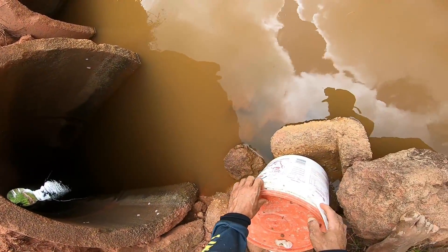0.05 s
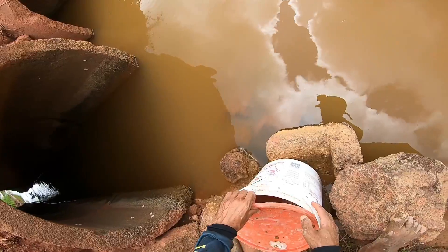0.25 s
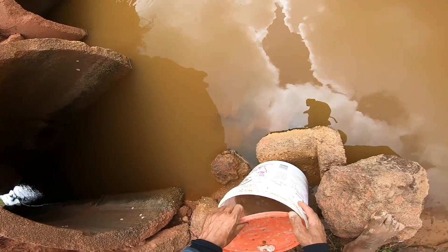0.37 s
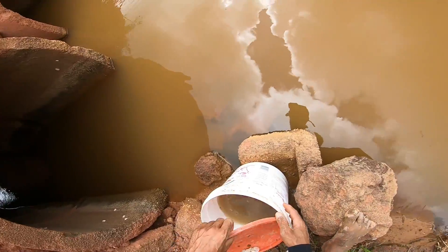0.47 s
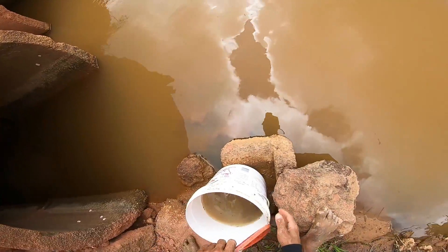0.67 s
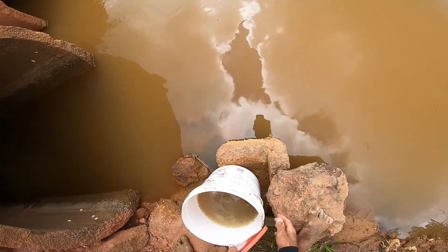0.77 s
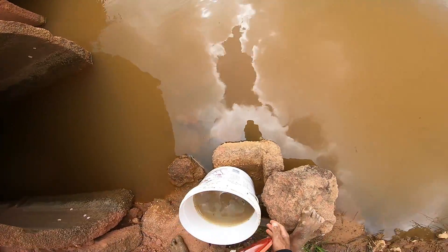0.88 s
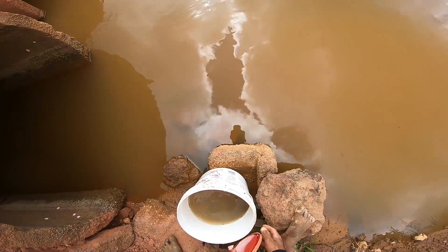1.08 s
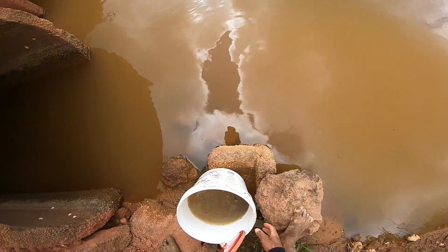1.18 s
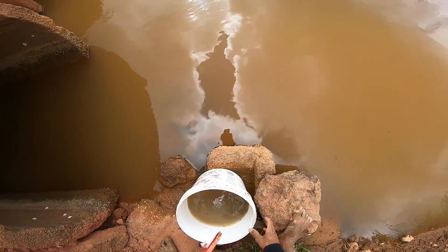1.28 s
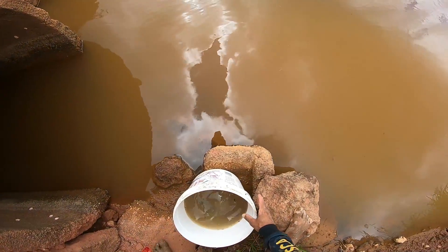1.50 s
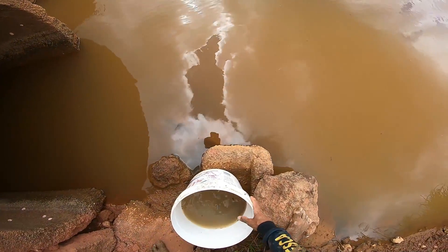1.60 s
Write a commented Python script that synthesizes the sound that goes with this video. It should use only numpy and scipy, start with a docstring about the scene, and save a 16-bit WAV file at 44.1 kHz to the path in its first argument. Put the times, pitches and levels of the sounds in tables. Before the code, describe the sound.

Plastic bucket being opened and set down: lid thump, scraping rattle, one booming knock, faint outdoor hiss

```python
"""Rocks beside a ditch and a concrete pipe: a plastic bucket of water stands close to two microphones.
Its lid pops off with a thump: a puff of noise, and two air tones that climb as the gap opens.
The lid rubs along the rim as fine clicks and friction noise; knocks are noise bursts with ringing modes,
and the water plops. One hard knock booms, an echo tail is the pipe's answer, and light ticks follow.
Faint outdoor hiss, shaped from noise, lies under it all."""
import sys
import numpy as np
from scipy import signal
from scipy.fft import rfft, irfft, next_fast_len
from scipy.io import wavfile

SR = 44100
rng = np.random.default_rng(int(sys.argv[2]) if len(sys.argv) > 2 else 0)


def waveform_to_disk(signal):
    """Save audio, clipped to [-1, 1], as 16-bit WAV at the path in sys.argv[1]."""
    frames = np.transpose(np.atleast_2d(signal))
    scaled = np.clip(frames, -1, 1) * 32767
    samples = np.round(scaled).astype(np.int16)
    wavfile.write(sys.argv[1], SR, samples)


N = 72765
TIME = np.arange(N) / SR
SIZE = next_fast_len(2 * N)
HZ = np.maximum(np.arange(SIZE // 2 + 1) * SR / SIZE, 1)

# plastic strikes plastic; levels are relative, ahead of colour and placing:
# start_s, level_1100hz_db, level_3300hz_db, level_7500hz_db, crack_t60_s, hollow_db, spot_hz, spot_db
CONTACTS = [(0.1514, -41, -55.5, -56, 0.025, -52, 1640, -57),
            (.248, -19.5, -30, -30, 0.035, -25, 2470, -26.5),
            (.2502, -29, -35.5, -53, 0.027, -35, 695, -19),
            (0.3006, -39.5, -20.5, -43.5, 0.029, -46.5, 2000, -26),
            (0.3199, -36, -40, -52, .019, -34, 2240, -42), (.362, -48, -43.5, -43, 0.13, -50.5, 2730, -38),
            (0.685, -35, -41, -56, .028, -48, 926, -35), (.694, -37.5, -45.5, -52, 0.021, -53, 1580, -41.5),
            (0.7214, -44, -52, -54.5, 0.058, -51.5, 1390, -49),
            (0.7736, -29.5, -29, -31, .042, -46.5, 5120, -32.5),
            (0.7752, -26.5, -33.5, -40.5, 0.03, -45, 3675, -26),
            (0.7776, -30, -36, -48, 0.053, -33, 1343, -17.5),
            (.7865, -40, -43, -52, 0.0085, -31.5, 2040, -35.5),
            (0.7924, -36, -36, -45.5, 0.017, -35, 3755, -37),
            (.8857, -34.5, -42, -48, 0.02, -45.5, 1170, -36.5),
            (0.9375, -23.5, -22, -22, 0.024, -43, 2910, -22),
            (.9398, -14.5, -32.5, -36.5, .015, -34, 1329, -18),
            (1.1629, -60, -37, -36.5, .028, -57.5, 3560, -43.5),
            (1.294, -73, -52.5, -69, 0.026, -82.5, 2850, -55),
            (1.316, -57, -57.5, -55, 0.025, -80.5, 3245, -48.5),
            (1.401, -79, -68, -53, 0.042, -84, 6150, -56)]


def from_db(db):
    """Decibels to gain."""
    return 10 ** (np.asarray(db) / 20)


def rms_one(x):
    """Scale to unit rms."""
    return x / np.sqrt(np.mean(x ** 2) + 1e-20)


def in_time(rows):
    """Columns of a curve at every sample."""
    s, *columns = np.transpose(rows)
    return [np.interp(TIME, s, c) for c in columns]


def by_hz(rows):
    """Columns of a spectrum at every frequency, interpolated along log frequency."""
    hz, *columns = np.transpose(rows)
    return [np.interp(np.log(HZ), np.log(hz), c) for c in columns]


def colour(x, db):
    """Causal (minimum-phase) filter with the given gain, by folding its cepstrum."""
    cepstrum = irfft(np.log(from_db(db)), SIZE)
    cepstrum[1:SIZE // 2] *= 2
    cepstrum[SIZE // 2 + 1:] = 0
    response = np.exp(rfft(cepstrum))
    return irfft(rfft(x, SIZE) * response, SIZE)[..., :N]


def registers(parts, centres_hz, edge=1):
    """Cross-fade signals along frequency, more abruptly with a higher edge; also return a pink tilt in dB."""
    mixed = 0
    for part, row in zip(parts, np.eye(len(parts))):
        share = np.interp(np.log(HZ), np.log(centres_hz), row)
        share = np.clip(.5 + edge * (share - .5), 0, 1)
        mixed = mixed + rfft(part, SIZE) * share
    # above 100 Hz the tilt gives unit white noise unit rms per octave
    pink_db = 10 * np.log10(SR / np.sqrt(2) / np.maximum(HZ, 100))
    return irfft(mixed, SIZE)[..., :N], pink_db


def ring(x, hz, t60):
    """Two-pole resonance: a click sets a decaying tone ringing; a band-pass an octave each way trims it."""
    r, w = from_db(-60 / (t60 * SR)), 2 * np.pi * hz / SR
    tone = signal.lfilter([.5, 0, -.5], [1, -2 * r * np.cos(w), r * r], x + 1e-18)
    band = signal.butter(2, [hz / 2, hz * 2], "band", fs=SR, output="sos")
    return signal.sosfilt(band, tone)


def decay(start, t60):
    """Sudden start, exponential fall as far as -180 dB."""
    return (TIME >= start) * from_db(-60 * np.clip((TIME - start) / t60, 0, 3))


def swell(start, rise, t60):
    """Rounded start, exponential fall."""
    return (1 - np.exp(-np.maximum(TIME - start, 0) / rise)) * decay(start, t60)


def low_noise(hz, order=2):
    """Low-passed noise of unit rms, taken after the filter has settled."""
    low_pass = signal.butter(order, hz, fs=SR, output="sos")
    return rms_one(signal.sosfilt(low_pass, rng.standard_normal(2 * N))[N:])


def pan(db):
    """Left and right gains of equal total power; db is left minus right."""
    gains = from_db(np.array([db, -db]) / 2).reshape(2, -1)
    return gains / np.sqrt(np.mean(gains ** 2, axis=0))


def outdoors():
    """Faint wide hiss: coloured noise, almost unrelated left and right."""
    # colour of the open air: pitch_hz, relative_level_db
    hiss_colour = [(25, 3.94), (60, -10), (110, -10), (175, 6.98), (300, -3), (550, -6), (800, -1),
                   (1300, -2), (2200, -7), (4000, -8), (6500, -8), (8000, -12), (10000, -25), (15000, -42)]
    # slow drift of the hiss: time_s, level_db
    hiss_level = [(0, -62), (1.1, -65), (1.25, -66), (1.47, -66.5), (1.53, -64.5), (1.65, -64)]
    alike = 0.05  # power share common to both sides
    common, apart = rng.standard_normal(N), rng.standard_normal((2, N))
    white = np.sqrt(alike) * common + np.sqrt(1 - alike) * apart
    hiss = rms_one(colour(white, by_hz(hiss_colour)[0]))
    return pan(-3.5) * from_db(in_time(hiss_level)[0]) * hiss


def lid_rub():
    """The lid sticks and slips on the rim: clumps of tiny clicks over a smoother friction noise."""
    # strength of the rub by register, ahead of its colour: time_s, level_400hz_db, level_1500hz_db, level_6000hz_db
    rub_levels = [(0, -65.5, -64.5, -94), (.228, -60.5, -63, -97), (.255, -28, -38, -59),
                  (.3, -39.5, -39, -50.5), (.35, -36, -46, -56), (.42, -43.5, -54.5, -68),
                  (.515, -52.5, -58, -58.5), (.56, -56.5, -68.5, -75.5), (.62, -51, -55, -68.5),
                  (.66, -54.5, -62, -69.5), (.715, -50.5, -51, -61.5), (.765, -50, -41.5, -62),
                  (.795, -41.5, -50, -51.5), (.86, -61.5, -69.5, -66.5), (.93, -48, -58.5, -65.5),
                  (.99, -39.5, -49, -69), (1.12, -79.5, -73, -77), (1.65, -111, -89, -72.5)]
    # colour of lid on rim: pitch_hz, relative_level_db
    rub_colour = [(90, -46.5), (140, -15), (195, -3), (260, -7), (370, -2.5), (600, -6), (850, -3.5),
                  (1150, -7.5), (1500, -1), (2200, -1.5), (3400, -1.5), (5000, 1.5), (7300, 1.5),
                  (9500, -17), (15000, -25.5)]
    grains_per_s, grain_spread_db, smooth_share = 550, 4.5, 0.59
    clump_db, clump_hz = 2.5, 80

    slips = rng.random(N) < grains_per_s / SR
    sizes = from_db(grain_spread_db * np.minimum(rng.exponential(1, N), 3))
    clicks = rms_one(slips * sizes * rng.choice([-1, 1], (2, N)))
    friction = rng.standard_normal((2, N))
    grain = np.sqrt(1 - smooth_share) * clicks + np.sqrt(smooth_share) * friction
    parts = []
    for db in in_time(rub_levels):
        clumps = rms_one(from_db(clump_db * low_noise(clump_hz)))
        parts.append(grain * clumps * from_db(db))
    rub, pink_db = registers(parts, [400, 1500, 6000])
    return colour(rub, pink_db + by_hz(rub_colour)[0])


def pipe_echo(x):
    """The concrete pipe, stronger on the left, returns a short diffuse tail: convolution with decaying noise."""
    # answer of the pipe, with its broad resonances: pitch_hz, gain_db
    pipe_colour = [(100, -29), (350, -26.5), (640, -25.5), (830, -9), (1060, -19.5), (1450, -14.5),
                   (1950, -23.5), (2600, -12.5), (3500, -20), (4500, -20), (5600, -18.5), (7000, -23),
                   (14000, -27.5)]
    delay_s, rise_s, t60_s = 0.0013, 0.016, 0.39
    tail = rng.standard_normal((2, N)) * swell(delay_s, rise_s, t60_s)
    tail = rms_one(tail) / np.sqrt(N)  # unit energy
    tail = colour(tail, by_hz(pipe_colour)[0])
    return pan(4) * signal.fftconvolve(tail, x[None], axes=1)[:, :N]


def cracks():
    """Each contact is a snap and a burst of dense, quickly dying wall vibration; its thud follows the hollow ring."""
    # colour of the thin walls: pitch_hz, relative_level_db
    wall_colour = [(45, -63), (110, -48.5), (200, -20.5), (420, -2), (600, -6), (760, 1), (960, -2),
                   (1350, -0.5), (1700, -5), (3000, -2), (5600, -4.5), (7200, -0.5), (8800, -15),
                   (11000, -25.5), (15000, -36.5)]
    snap_db, snap_t60_s = -2, 0.0043  # the first instant stands out of its crack
    thud_over_hollow_db = 6.5

    grain, envelopes = rng.choice([-1., 1.], (2, N)), np.zeros((4, N))
    for s, mid_db, upper_db, top_db, t60, hollow_db, *_ in CONTACTS:
        shape = decay(s, t60) + from_db(snap_db) * decay(s, snap_t60_s)
        levels_db = [hollow_db + thud_over_hollow_db, mid_db, upper_db, top_db]
        envelopes += np.outer(from_db(levels_db), shape)
    burst, pink_db = registers([grain * e for e in envelopes], [500, 1100, 3300, 7500], edge=1.8)
    return colour(burst, pink_db + by_hz(wall_colour)[0])


def spots():
    """Each struck spot of the wall or lid rings briefly with a close pair of modes at its own pitch."""
    t60_s, pair_ratio, pair_db, low_cut_hz = .03, 1.14, -7.5, 600
    out = np.zeros(N)
    for s, *_, hz, db in CONTACTS:
        phase = 2 * np.pi * hz * (TIME - s)
        modes = np.sin(phase) - from_db(pair_db) * np.sin(pair_ratio * phase)
        out += from_db(db) * decay(s, t60_s) * modes
    return signal.sosfilt(signal.butter(2, low_cut_hz, "high", fs=SR, output="sos"), out)


def hollow():
    """Every knock is a click that rings the air in the open bucket."""
    # resonances of the air: pitch_hz, relative_level_db, t60_s
    air_modes = [(327.4, 0, .11), (437, -5, 0.074), (526, -9.5, 0.11), (901, -13.5, .1)]
    clicks = np.zeros(N)
    for s, *_, hollow_db, _spot_hz, _spot_db in CONTACTS:
        clicks[int(s * SR)] += from_db(hollow_db)
    return sum(from_db(db) * ring(clicks, hz, t60) for hz, db, t60 in air_modes)


def lid_pop():
    """A puff of low noise, and two air resonances that climb as the gap under the lid widens."""
    # lower air resonance: time_s, pitch_hz, rms_level_db (ahead of its waver)
    air_low = [(.22, 141, -63), (.243, 141.3, -43), (.251, 143, -20), (.283, 133.3, -22),
               (.303, 135, -35.5), (.335, 166.7, -26), (.36, 161.7, -39.5), (.385, 153, -52),
               (.43, 172.3, -43.5), (.48, 224, -64), (.53, 226, -61)]
    # upper air resonance: time_s, pitch_hz, rms_level_db (ahead of its waver)
    air_high = [(.243, 200, -46), (0.248, 197.3, -21.5), (0.274, 197.2, -26), (0.304, 224.5, -46.5),
                (.335, 242.4, -33), (.365, 233.4, -33), (0.389, 278.2, -47), (.425, 281.8, -41.5),
                (0.461, 315, -49.5), (.53, 358, -59)]
    puff_s, puff_rise_s, puff_t60_s = .248, .025, 0.42
    puff_db, puff_corner_hz = -28.5, 43.5
    waver_db, waver_hz = 1.2, 46.8

    puff = rms_one(np.gradient(low_noise(puff_corner_hz, order=3)))  # the slope thins the deepest bass
    out = from_db(puff_db) * puff * swell(puff_s, puff_rise_s, puff_t60_s)
    for curve in (air_low, air_high):
        hz, db = in_time(curve)
        sounding = (TIME > curve[0][0]) & (TIME < curve[-1][0])
        level = np.sqrt(2) * from_db(db + waver_db * low_noise(waver_hz))  # rms to peak
        tone = np.sin(2 * np.pi * np.cumsum(hz * sounding) / SR)
        out = out + sounding * level * tone
    return out


def plops():
    """Water bumps the wall with a short tone that sags in pitch."""
    # soft plops: start_s, level_db
    bumps = [(0.559, -35), (0.595, -36.5), (0.67, -26), (0.713, -34.5)]
    settled_hz, sag_hz, sag_s = 333.7, 171, 0.0034  # starts higher by the sag
    rise_s, t60_s = 0.0016, .055
    out = np.zeros(N)
    for s, db in bumps:
        hz = (TIME >= s) * (settled_hz + sag_hz * np.exp(-np.abs(TIME - s) / sag_s))
        tone = np.sin(2 * np.pi * np.cumsum(hz) / SR)
        out += from_db(db) * swell(s, rise_s, t60_s) * tone
    return out


def shell_swing():
    """The hard knock sets shell and lid booming; slow modes build up late and waver in level and pitch."""
    # modes of the shell and lid, ahead of waver and settling: pitch_hz, level_db, t60_s, rise_s
    modes = [(84.85, -11.5, 0.23, 0.15), (116.6, -27.5, 0.086, 0.017), (188.8, -23, 0.17, 0.0021),
             (302, -34.5, .049, .002), (373.7, -8.5, 0.073, 0.00058), (772, -31, .26, .005),
             (845, -22.5, .18, .06)]
    start_s, waver_db, waver_hz, wander_share = .9392, 5, 29.6, .04
    settle_s = 0.18  # damped quickly once the bucket settles on the rocks

    unsteady = np.clip((TIME - start_s) * waver_hz, 0, 1)  # the waver grows in
    out = np.zeros(N)
    for hz, db, t60, rise in modes:
        pitch = hz * (TIME >= start_s) * (1 + wander_share * unsteady * low_noise(waver_hz))
        level = from_db(db + waver_db * unsteady * low_noise(waver_hz))
        tone = np.sin(2 * np.pi * np.cumsum(pitch) / SR)
        out += level * swell(start_s, rise, t60) * tone
    return out * np.exp(-((TIME - start_s) / settle_s) ** 4)


def at_ports(pair, plain):
    """Place the bucket: two unrelated textures blend into left and right; pure tones reach both microphones."""
    # bucket at the two microphones: pitch_hz, left_minus_right_db, left_lead_rad, unlike_share (0-1)
    ports = [(100, -0.5, -0.7, .05), (350, -1.6, -0.1, .08), (750, -7, 0.2, 0.73), (1400, -9, 0.6, 0.47),
             (2926, -5.5, 0.1, 0.36), (6500, -3, -.7, 0.64), (12000, 3.5, -0.39, 0.74)]
    balance_db, lead, unlike = by_hz(ports)
    sign = np.array([[1], [-1]])
    mid, side = rfft(pair, SIZE)
    textures = mid * np.sqrt(1 - unlike ** 2) + sign * side * unlike
    both = textures + rfft(plain, SIZE)
    phase_lead = np.exp(sign * lead * 1j / 2)
    return irfft(both * pan(balance_db) * phase_lead, SIZE)[:, :N]


def scene():
    """The bucket close by, the answer of the pipe, the open air."""
    texture = cracks() + lid_rub()
    tones = spots() + hollow() + plops() + shell_swing() + lid_pop()
    return at_ports(texture, tones) + pipe_echo(texture[0] + tones) + outdoors()


def record(dry):
    """The deepest bass and the top are cut."""
    low_cut = signal.butter(2, 50, "high", fs=SR, output="sos")
    top_cut = signal.cheby2(12, 70, 15600, fs=SR, output="sos")  # 70 dB down from 15.6 kHz
    return signal.sosfilt(top_cut, signal.sosfilt(low_cut, dry))


dry = scene()
out = record(dry)
waveform_to_disk(out)
```